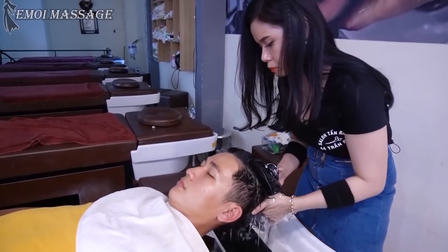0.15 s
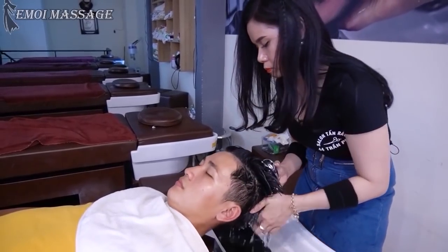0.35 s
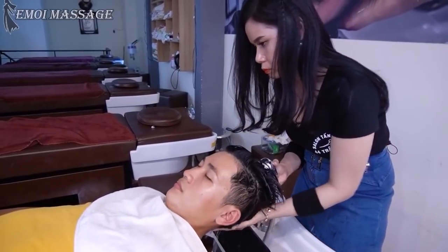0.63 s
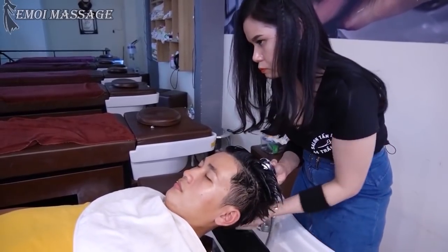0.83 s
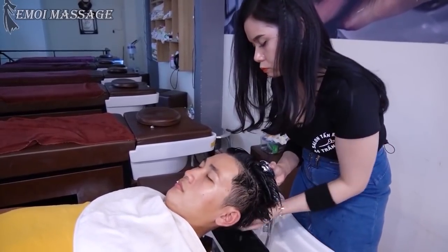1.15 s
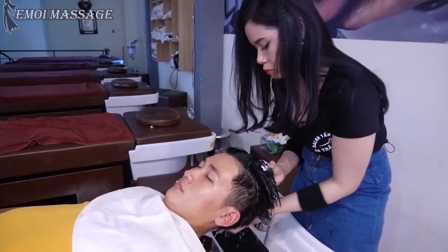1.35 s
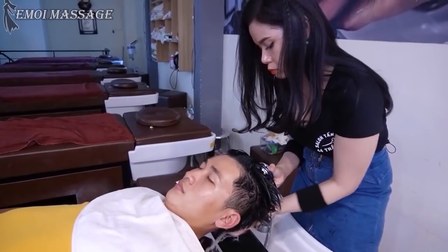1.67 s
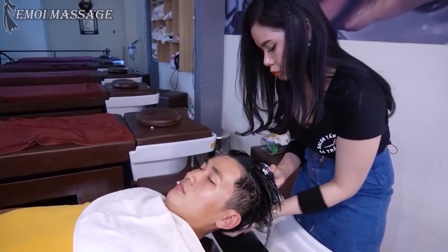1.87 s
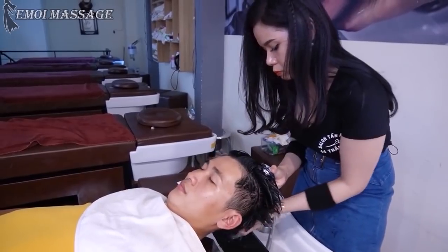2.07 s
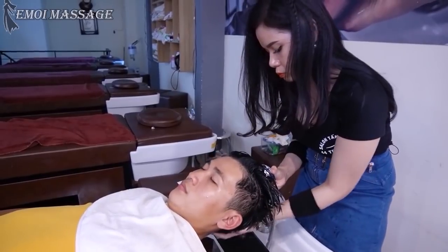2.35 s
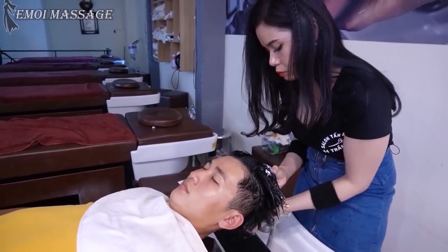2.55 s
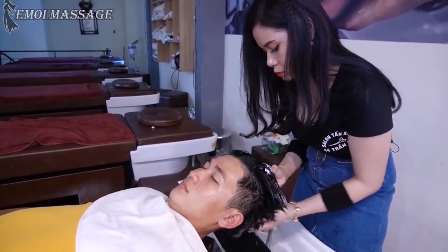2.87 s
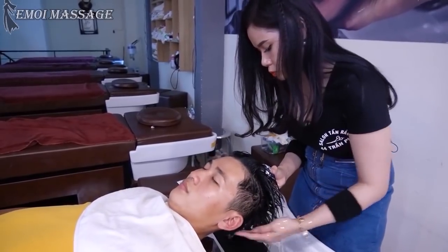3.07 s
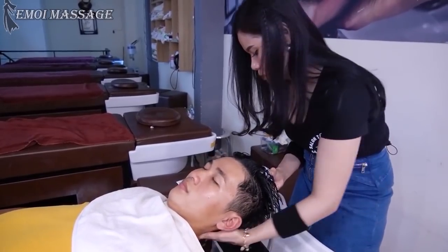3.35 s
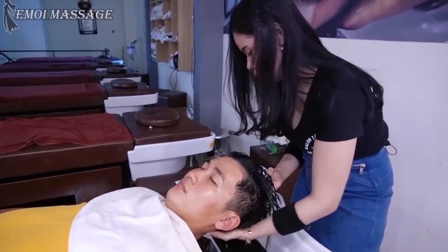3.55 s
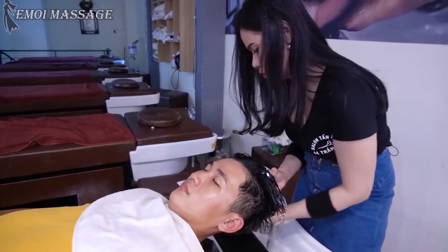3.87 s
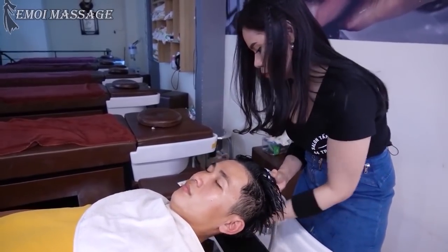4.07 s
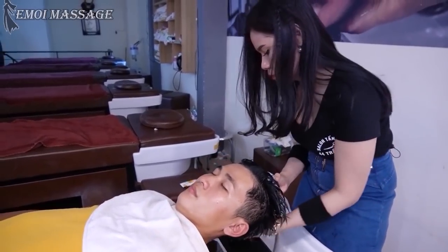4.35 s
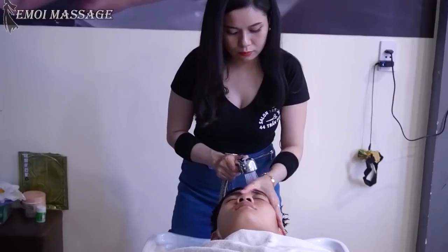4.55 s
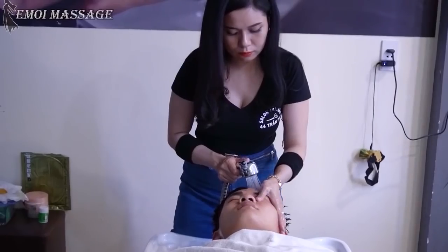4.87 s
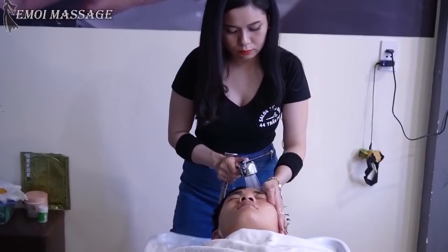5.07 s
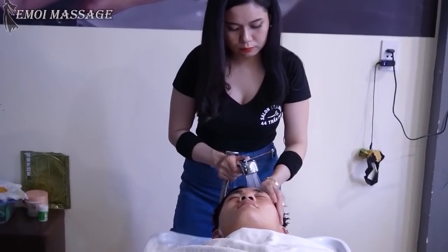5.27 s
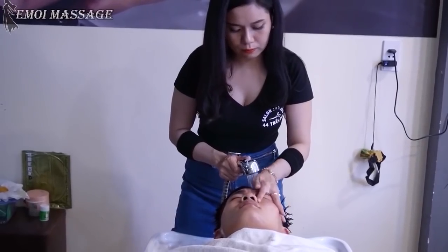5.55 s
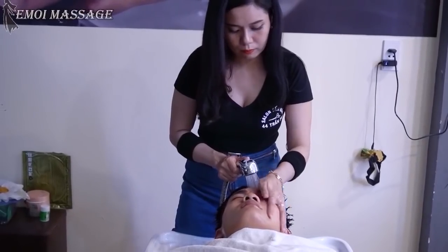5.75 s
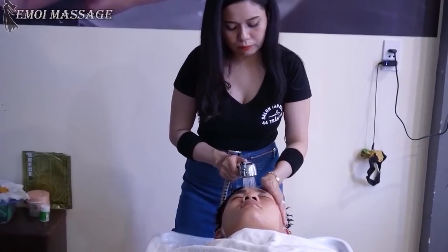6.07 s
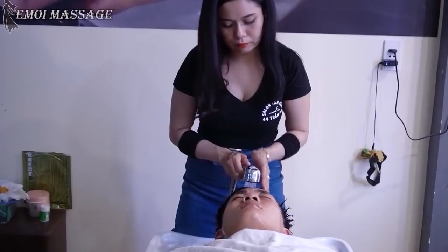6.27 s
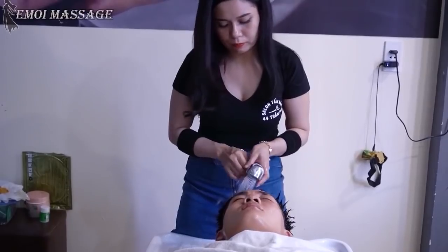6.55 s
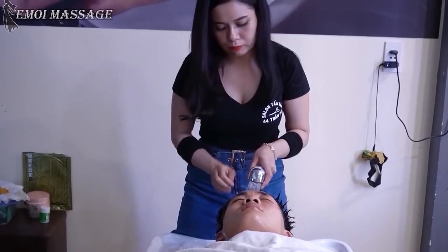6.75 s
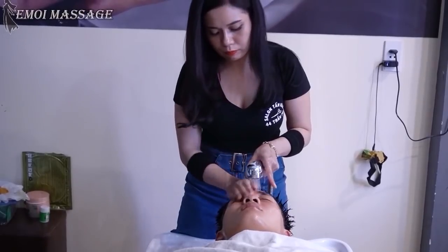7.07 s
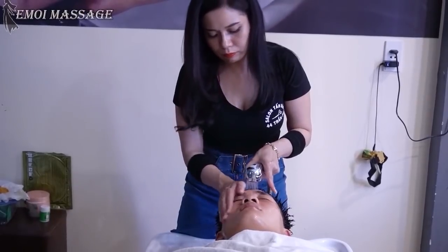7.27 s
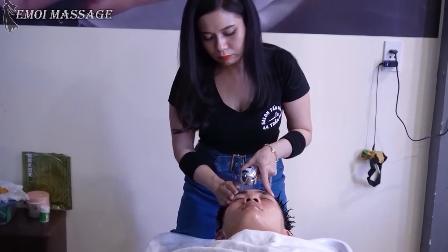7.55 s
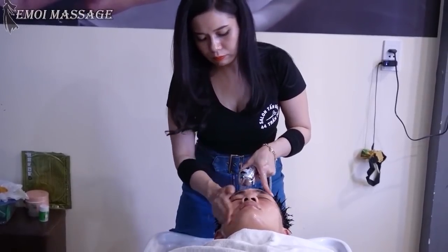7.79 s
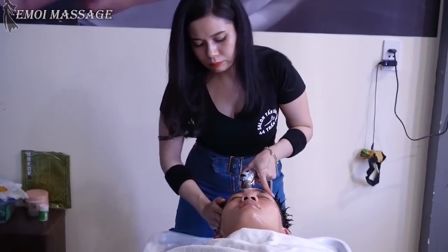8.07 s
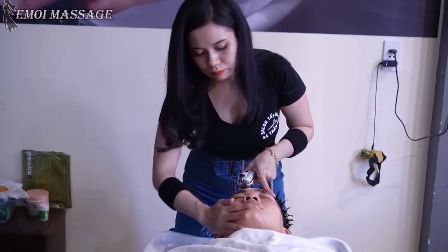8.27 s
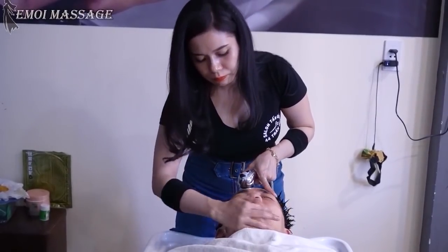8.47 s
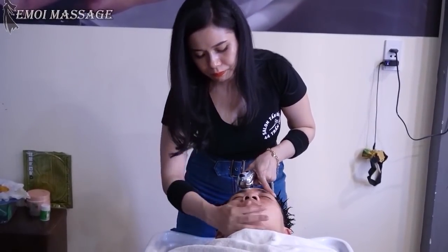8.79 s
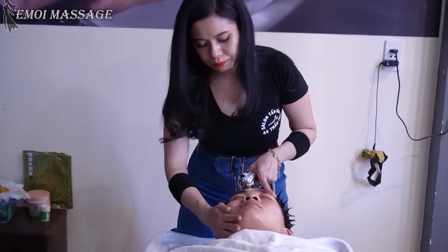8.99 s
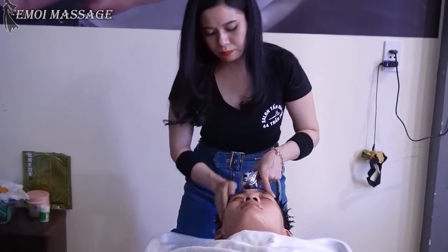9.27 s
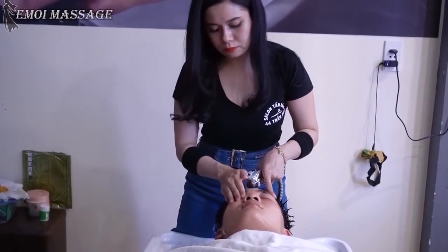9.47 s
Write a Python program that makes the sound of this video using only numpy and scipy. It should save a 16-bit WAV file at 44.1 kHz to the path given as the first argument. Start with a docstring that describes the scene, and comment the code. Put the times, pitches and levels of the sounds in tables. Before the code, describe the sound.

Wet hair squelches and pops under working hands while a fine handheld spray hisses and patters close up in a small hard room.

```python
"""Salon hair rinse

Hair is rinsed over a basin with a handheld sprayer, close up, in a small hard room; a fan hums behind.
Spray and wash are shaped random impacts and noise; pops, squeezes and presses are noise bursts
ringing air-pocket resonances. Gurgles are trains of decaying, rising sine bubbles; soft low bumps
and one deep rumble are low noise bursts. Steady tones make the hum, shaped noise the air and echoes.
"""
import sys
import numpy as np
from scipy import signal
from scipy.fft import rfft, irfft, next_fast_len
from scipy.io import wavfile
from scipy.ndimage import uniform_filter1d, map_coordinates

SR = 44100
rng = np.random.default_rng(int(sys.argv[2]) if len(sys.argv) > 2 else 0)


def to_wav(sig):
    """Store sig (one row per channel, or 1-D mono) as 16-bit WAV at the path in sys.argv[1].

    Samples outside -1..1 are clipped; the rate is SR.
    """
    pcm = np.clip(np.atleast_2d(sig), -1, 1) * 32767
    pcm = np.round(pcm).astype(np.int16)
    wavfile.write(sys.argv[1], SR, pcm.T)  # frames by channels


N = 424683

# spray course, before layer trims: t/s, fine mist level/dB, drop patter level/dB
SPRAY_COURSE = [(0, -46.5, -46.5), (.53, -45, -48), (.7, -53, -53), (1.05, -50.5, -59.5),
                (1.35, -56.5, -68), (2.3, -58, -62), (3, -57.5, -56), (3.9, -57.5, -58.5), (4.22, -47, -49),
                (4.38, -55, -56), (4.57, -54.5, -58), (4.61, -43, -46.5), (4.9, -42.5, -40.5),
                (5.4, -47, -47), (5.9, -44, -49), (6.3, -49.5, -55.5), (7.8, -51, -56.5),
                (9.63, -47.5, -47.5)]
# mist colour: f/Hz, gain/dB
MIST_COLOUR = [(150, -23.5), (500, -10), (1300, -8), (2500, -11.5), (4000, -11.5), (7000, -20.5),
               (9500, -4.5), (11800, -8.5), (12500, 9.5), (14500, 2.5), (16000, -2)]
# drop patter colour: f/Hz, gain/dB
PATTER_COLOUR = [(900, -40), (4000, -13.5), (7500, 1.5), (11000, -4.5), (16000, -8.5)]
# room air colour: f/Hz, gain/dB
AIR_COLOUR = [(20, -18), (45, 0.5), (120, -3), (185, -0.5), (280, -13), (390, -5.5), (480, -14), (680, -13),
              (1500, -24), (16000, -44)]
# room air course: t/s, level/dB
AIR_COURSE = [(4.57, -62.5), (4.58, -56.5), (6, -58)]
# steady fan tones at their loudest: f/Hz, level/dB
FAN_TONES = [(75.4, -68), (549.1, -72)]
# wall decay: f/Hz, t60/s
WALL_DECAY = [(300, 0.25), (6000, 0.11), (15000, 0.11)]
# soft low bumps, and one deep rumble at 50 Hz: t/s, level/dB, f/Hz, length scale/s
LOW_BUMPS = [(0, -51, 240, 0.046), (0.478, -53, 196, 0.042), (2.753, -55, 402, .04),
             (4.62, -45, 152, 0.052), (4.579, -49, 50, 0.059), (7.692, -48.5, 231, 0.028),
             (8.14, -50, 207, 0.12), (9.449, -48.5, 176, .11), (9.577, -38.5, 223, .052)]
# single large air pockets: t/s, level/dB, f/Hz, width/oct (before the floor in squelch)
POCKET_POPS = [(.1, -25, 3980, 0.88), (.132, -11.5, 5260, 0.15), (.138, -10, 3680, 0.78),
               (.184, -14.5, 7560, 2.8), (.22, -10.5, 5350, .36), (.292, -11.5, 5860, 1.1),
               (.319, -16.5, 5240, 1.01), (.423, -19, 3404, 0.12), (.507, -19, 6460, 1.1),
               (.678, -32.5, 4590, 0.078), (1.184, -22, 3380, 0.5), (1.858, -25, 3700, .27),
               (2.031, -32.5, 2490, 0.57), (2.31, -34.5, 6050, 0.21), (2.936, -27, 4380, 0.49),
               (3.059, -27, 4460, 1.4), (3.107, -19.5, 11020, 1.97), (3.281, -20.5, 2620, 0.69),
               (3.458, -39.5, 4425, 2), (3.861, -40, 3505, .18), (4.141, -22, 8330, 0.21),
               (4.218, -19.5, 7580, 1.2), (4.228, -11, 7210, 0.16), (4.301, -37, 2186, .18),
               (4.378, -25, 2820, 0.63), (4.386, -21, 3870, 0.2), (4.63, -22.5, 6860, 0.47),
               (4.969, -30, 1678, 0.13), (4.978, -20.5, 5540, 0.36), (5.071, -20.5, 6554, 0.6),
               (5.499, -24, 5510, 0.2), (6.169, -18.5, 8240, 0.14), (6.733, -17.5, 8430, 0.15),
               (7.253, -25, 5420, 0.15), (7.39, -15, 5340, 0.21), (7.986, -43, 2230, 0.13),
               (8.106, -22, 3450, 0.19), (8.327, -23, 6840, 0.71), (8.367, -19.5, 7030, 0.61),
               (8.42, -25, 6760, 0.23), (8.736, -34.5, 3870, 0.22), (8.785, -46, 1444, 0.18),
               (8.804, -20, 7720, 0.88), (8.867, -19, 5830, 0.32), (8.995, -36, 3370, 0.65),
               (9.089, -20.5, 5790, 0.63), (9.182, -15.5, 5390, 0.19), (9.207, -22, 5800, 0.48),
               (9.476, -39.5, 3050, 0.78), (9.548, -42, 2050, 0.17), (9.595, -26, 6760, .25)]
# gurgles in a hollow of hand and hair, before trim: t/s, length/s, level/dB, start f/Hz, end f/Hz
HOLLOW_GURGLES = [(0.12, 0.046, -39, 1473, 1562), (0.158, .19, -56, 1485, 729),
                  (4.665, 0.56, -55.5, 2473, 1198), (5.721, 0.11, -48, 2710, 2650),
                  (5.816, 0.22, -42, 3580, 3584), (6.065, 0.12, -52, 2860, 2980),
                  (6.335, 0.21, -50.5, 1886, 1640), (6.501, 0.044, -39.5, 1820, 1750),
                  (6.543, 0.065, -43, 864, 911), (6.55, .115, -42.5, 1250, 1207),
                  (7.26, 0.18, -41, 3374, 3090)]
# finger squeezes: t/s, length/s, level/dB before size spread, centre f/Hz, width/oct before narrowing
FINGER_SQUEEZES = [(.15, 0.085, -33, 6400, 2.07), (0.246, 0.033, -14.5, 5370, 0.29),
                   (0.275, 0.076, -23.5, 5830, 1.12), (0.398, 0.089, -41, 3080, 0.45),
                   (1.452, 0.027, -44, 2483, 0.61), (2.391, 0.038, -38.5, 2800, 0.44),
                   (2.777, .035, -36, 5060, 1.22), (3.311, .035, -31, 9900, 1.2),
                   (3.742, .18, -52, 5440, 0.24), (4.031, 0.13, -38.5, 6326, 1.26),
                   (4.129, 0.14, -47.5, 3060, 0.77), (5.04, 0.14, -38, 6800, 0.87),
                   (5.921, .06, -27.5, 8870, 0.44), (6.152, 0.046, -33.5, 9240, .6),
                   (7.309, .06, -37, 6860, 0.88), (7.57, 0.04, -45.5, 5230, 0.41),
                   (7.903, .05, -38, 4910, 0.39), (8.147, .25, -38, 6800, .8),
                   (8.648, .05, -45, 7030, 0.23), (8.812, .125, -32.5, 5760, 0.79)]
# cupped-hand presses: t/s, splash level/dB, splash f/Hz, suck level/dB
HAND_PRESSES = [(0.822, -29, 7710, -23), (1.163, -15, 8290, -18.5), (1.483, -12, 7450, -27.5),
                (1.86, -16, 7450, -14.5), (2.011, -19, 10890, -28), (2.2, -22, 6800, -15.5),
                (2.452, -17, 5130, -38), (2.567, -25, 7380, -17), (2.785, -23.5, 4430, -20),
                (3.284, -17, 5410, -25), (7.635, -25.5, 9500, -36.5)]

BUMP_REF_OCT, BUMP_REF_HZ = 0.47, 196.3  # width at this pitch; lower bumps are broader
POCKET_REF_S, POCKET_REF_HZ, POCKET_POWER = 0.0027, 5630, 0.59  # length at this pitch; lower lasts longer
LIFT_S, SUCK_HZ = 0.023, 7450  # landing-to-lift delay, suck pitch
SPLASH_OCT, SUCK_OCT = 0.78, 0.3
BAND_LIMIT_HZ = 16100


def amp(db):
    """Decibels to gain."""
    return 10 ** (np.asarray(db) / 20)


def unit(x):
    """Scale to rms 1."""
    return x / np.sqrt(np.mean(x ** 2) + 1e-20)


def along(points, hz):
    """Interpolate (Hz, value) points on a log-frequency axis."""
    f, v = np.transpose(points)
    return np.interp(np.log(hz + 1), np.log(f + 1), v)


def curves(rows):
    """One value per sample for each column after the time."""
    s, *columns = np.transpose(rows)
    t = np.arange(N) / SR
    return [np.interp(t, s, column) for column in columns]


def wobble(rate_hz):
    """Smooth random curve with the given knot rate."""
    knots = rng.standard_normal(int(N * rate_hz / SR) + 4)
    return map_coordinates(knots, [np.arange(N) * rate_hz / SR])


def filtered(x, response):
    """Apply a frequency response by FFT."""
    size = next_fast_len(len(x) + SR // 2)
    spectrum = rfft(x, size) * response(np.fft.rfftfreq(size, 1 / SR))
    return irfft(spectrum, size)[:len(x)]


def ringing(response, size=4096):
    """Minimum-phase impulse response of a gain curve, by cepstral folding."""
    cepstrum = irfft(np.log(response(np.fft.rfftfreq(size, 1 / SR)) + 1e-6))
    cepstrum[1:size // 2] *= 2
    cepstrum[size // 2 + 1:] = 0
    return irfft(np.exp(rfft(cepstrum)))


def bell(hz, centre_hz, octaves):
    """Gain of a steep-sided resonance."""
    return np.exp(-2 * abs(np.log2((hz + 1) / centre_hz) / octaves) ** 3)


def add(track, s, sound):
    """Mix a sound into the track at time s."""
    part = track[max(round(s * SR), 0):][:len(sound)]
    part += sound[:len(part)]


def patchy(x, depth_db, size=9):
    """Blotchy, uneven texture: random time-frequency gain, smoothed over size bins; rms 1."""
    z = signal.stft(x, nperseg=256)[2]
    field = uniform_filter1d(rng.standard_normal(z.shape), size, axis=0)
    field = uniform_filter1d(field, size, axis=1)
    return unit(signal.istft(z * amp(depth_db * unit(field)), nperseg=256)[1][:N])


def burst(db, length_s, response, clump_db, swell=0.67):
    """Clumpy noise rush swells, dies and rings a resonance; db is level over length_s."""
    t = np.arange(int(4 * length_s * SR) + 8) / SR
    knots = np.clip(rng.standard_normal(int(t[-1] * 200) + 4), -2, 2)
    clumps = map_coordinates(knots, [t * 200], order=1)
    grain_db = 3.05 * rng.standard_normal(len(t))
    rush = rng.standard_normal(len(t)) * amp(grain_db + clump_db * clumps)
    envelope = (t / length_s) ** swell * np.exp(-2 * t / length_s)
    sound = signal.fftconvolve(rush * envelope, ringing(response))
    return amp(db) * np.sqrt(length_s * SR) * sound / np.linalg.norm(sound)


def pocket(db, pitch_hz, octaves, length_s, splash_db=-20, thud_db=-56, clump_db=7):
    """Air pocket: its resonance, torn-film splash above, trace of body below."""
    def gain(hz):
        above = 1 / (1 + (pitch_hz / (hz + 1)) ** 8) / (1 + (hz / pitch_hz / 2) ** 2)
        # narrow, clean-toned pockets splash least
        splash = amp(splash_db) * np.sqrt(octaves) * above
        body = amp(thud_db) * hz / (hz + 900)
        return bell(hz, pitch_hz, octaves) + splash + body

    # long splashes break into separate spurts
    return burst(db, length_s, gain, clump_db * length_s / (length_s + 0.0086))


def squelch(db, pitch_hz, octaves, count=4, after_db=-16, after_s=0.022,
            ooze_db=-22, ooze_s=0.029, lead_s=0.008):
    """Water oozes, a pocket bursts, droplets land after it: list of (delay/s, sound)."""
    octaves = max(octaves, 0.17)
    length_s = POCKET_REF_S * (POCKET_REF_HZ / pitch_hz) ** POCKET_POWER
    parts = [(-length_s / 10, pocket(db, pitch_hz, octaves, length_s)),
             (-lead_s, pocket(db + ooze_db, pitch_hz, octaves + 0.28, ooze_s))]
    waits = rng.gamma(2, after_s / 2, count)
    sizes, shifts = rng.standard_normal((2, count))
    for wait, size, shift in zip(waits, sizes, shifts):
        drop_hz = min(1.2 * pitch_hz * np.exp(0.16 * shift), 14000)
        drop = pocket(db + after_db + 3 * size, drop_hz, 0.57 + octaves / 2, 0.0014)
        parts.append((wait, drop))
    return parts


def drops(rate_hz, spread_db):
    """Random impacts of uneven size and either sign, rms 1."""
    sizes = amp(spread_db * np.clip(rng.standard_normal(N), -2, 2)) * rng.choice([-1, 1], N)
    return unit(sizes * (rng.random(N) < rate_hz / SR))


def bubbles(rate_hz, spread_db, pitch_hz, octaves, length_s):
    """Many small pockets of random size, pitch and length, rms 1."""
    out = np.zeros(N)
    count = int(rate_hz * N / SR)
    times = rng.random(count) * N / SR
    variations = np.clip(rng.standard_normal((count, 3)), -2, 2)
    for s, (size, shift, stretch) in zip(times, variations):
        hz = pitch_hz * np.exp(0.29 * shift)
        add(out, s, pocket(spread_db * size, hz, octaves, length_s * np.exp(stretch / 2)))
    return unit(out)


def spray(mist_db=-1.0, patter_db=-6.0, bubble_db=-2):
    """Fine jets fizz on the hair; larger drops and bubbles patter into the basin."""
    mist_level_db, patter_level_db = curves(SPRAY_COURSE)
    flutter = np.clip(wobble(45), -1.7, 1.7)
    fine = filtered(drops(rate_hz=10000, spread_db=15.5), lambda hz: amp(along(MIST_COLOUR, hz)))
    mist = patchy(fine, depth_db=5)
    coarse = filtered(drops(rate_hz=4500, spread_db=16.0), lambda hz: amp(along(PATTER_COLOUR, hz)))
    patter = patchy(coarse, depth_db=8.5)
    froth = bubbles(rate_hz=120, spread_db=2.5, pitch_hz=6800, octaves=0.28, length_s=0.0081)
    splashes = patter * amp(patter_db + 2 * flutter) + amp(bubble_db) * froth
    return mist * amp(mist_level_db + mist_db + 4 * flutter) + splashes * amp(patter_level_db)


def wash(level_db=-5, full_db=-42, growth_db_per_db=2.4, centre_hz=6500, octaves=2.9):
    """Jets hit the scalp squarely: drops merge into a hiss that grows steeply with mist level."""
    flow_db, _ = curves(SPRAY_COURSE)
    noise = filtered(rng.standard_normal(N), lambda hz: bell(hz, centre_hz, octaves))
    sheet = patchy(noise, depth_db=4.5)
    return sheet * amp(full_db + level_db + growth_db_per_db * (flow_db - full_db) + wobble(11))


def background():
    """Low air noise and fan tones with wandering phase; both are louder in the second half."""
    level_db, = curves(AIR_COURSE)
    t = np.arange(N) / SR
    air = unit(filtered(rng.standard_normal(N), lambda hz: amp(along(AIR_COLOUR, hz))))
    hum = np.zeros(N)
    for hz, db in FAN_TONES:
        hum += amp(db) * np.sqrt(2) * np.sin(2 * np.pi * hz * t + wobble(1.2) / 2)
    # hum falls twice as many dB as the air below its final level
    hum_db = 2 * (level_db - level_db[-1]).clip(max=0)
    return air * amp(level_db) + hum * amp(hum_db)


def room(x, gap_s=0.003, count=4):
    """Walls answer with decaying noise; four random echo patterns take turns at a steady pace."""
    out = np.zeros(N)
    turn = (np.arange(N) / SR * np.pi).astype(int) % count
    for k in range(count):
        hz, t, z = signal.stft(rng.standard_normal(SR // 2), SR, nperseg=256)
        decay = amp(-60 * t / along(WALL_DECAY, hz)[:, None])
        tail = signal.istft(z * decay, SR, nperseg=256)[1]
        tail = np.pad(tail / np.linalg.norm(tail), (int(gap_s * SR), 0))
        out += signal.fftconvolve(x * (turn == k), tail)[:N]
    return out


def bumps():
    """Soft low bumps and one deep rumble: noise bursts through low resonances."""
    out = np.zeros(N)
    for s, db, pitch_hz, length_s in LOW_BUMPS:
        octaves = BUMP_REF_OCT * np.sqrt(BUMP_REF_HZ / pitch_hz)
        bump = burst(db, length_s, lambda hz: bell(hz, pitch_hz, octaves) + 0.002, clump_db=3.5)
        add(out, s - length_s / 10, bump)
    return out


def pops():
    """Large pockets burst one at a time."""
    out = np.zeros(N)
    for s, db, pitch_hz, octaves in POCKET_POPS:
        for delay_s, sound in squelch(db, pitch_hz, octaves):
            add(out, s + delay_s, sound)
    return out


def gurgle(level_db=-1, ref_rate_hz=800, ref_pitch_hz=2700, scatter=0.13, cycles=4, rise=0.028,
           fade_s=0.022, sag_db=3):
    """Jets beat bubbles into a hollow of hand and hair whose resonance slides."""
    out = np.zeros(N)
    for start_s, length_s, db, start_hz, end_hz in HOLLOW_GURGLES:
        # low bubbles come less often
        rate_hz = ref_rate_hz * (start_hz * end_hz / ref_pitch_hz ** 2) ** 0.7
        count = int(length_s * rate_hz) + 1
        progress = (np.arange(count) + 0.5) / count
        times = start_s + length_s * progress + rng.standard_normal(count) / rate_hz / 2
        edge_s = np.minimum(times - start_s, start_s + length_s - times)
        fade = np.clip(edge_s / fade_s, 0, 1)
        sizes = unit(amp(5.4 * np.clip(rng.standard_normal(count), -2, 2)))
        sizes = sizes * fade * amp(db + level_db + sag_db * (0.5 - progress))
        glide_hz = start_hz * (end_hz / start_hz) ** progress
        pitches_hz = glide_hz * np.exp(scatter * rng.standard_normal(count))
        for s, size, hz in zip(times, sizes, pitches_hz):
            age = np.arange(int(6 * cycles * SR / hz)) * hz / SR / cycles
            # pitch climbs as the bubble nears the surface
            phase = 2 * np.pi * cycles * age * (1 + rise * (age / 2 - 1))
            bubble = np.sin(phase) * age * np.exp(-2 * age)
            add(out, s, size * np.sqrt(SR / rate_hz) * bubble / np.linalg.norm(bubble))
    return out


def squeezes(rate_hz=280, spread_db=4, uneven_s=0.023, scatter=0.2, narrow=0.72, pocket_s=0.0041,
             spurt_db=-13, spurt_hz=10500, spurt_octaves=1.6):
    """Fingers wring out a quick swarm of uneven pockets, while a fine spurt of water hisses."""
    out = np.zeros(N)
    for s, length_s, db, pitch_hz, octaves in FINGER_SQUEEZES:
        count = int(length_s * rate_hz) + 1
        slip, size, shift = np.clip(rng.standard_normal((count, 3)), -2, 2).T
        times = s + (np.arange(count) + slip / 4) * length_s / count
        # long squeezes are more uneven
        sizes = unit(amp(spread_db * (length_s / uneven_s) ** 0.5 * size))
        gains = sizes * np.sqrt(length_s / count / pocket_s)
        pitches_hz = pitch_hz * np.exp(scatter * octaves * shift)
        for when, gain, hz in zip(times, gains, pitches_hz):
            add(out, when, gain * pocket(db, hz, narrow * octaves, pocket_s))
        add(out, s, pocket(db + spurt_db, spurt_hz, spurt_octaves, length_s))
    return out


def presses(fling_db=-13, fling_hz=11500, fling_octaves=1.71, fling_s=0.0064,
            snap_db=-3, snap_gap_s=0.008, snap_s=0.00039, snap_octaves=0.23):
    """Hand lands with a splash; lifting, hair sucks and flings drops; films snap around both."""
    out = np.zeros(N)
    for s, splash_db, splash_hz, suck_db in HAND_PRESSES:
        for delay_s, sound in squelch(splash_db, splash_hz, SPLASH_OCT):
            add(out, s + delay_s, sound)
        for delay_s, sound in squelch(suck_db, SUCK_HZ, SUCK_OCT):
            add(out, s + LIFT_S + delay_s, sound)
        fling = pocket(max(splash_db, suck_db) + fling_db, fling_hz, fling_octaves, fling_s)
        add(out, s + LIFT_S, fling)
        # one snap before landing, one either side of the suck
        for when in (-snap_gap_s, LIFT_S - snap_gap_s, LIFT_S + snap_gap_s):
            slip, size = rng.standard_normal(2)
            snap = pocket(suck_db + snap_db + 2 * size, SUCK_HZ, snap_octaves, snap_s)
            add(out, s + when + slip * snap_gap_s / 10, snap)
    return out


def scene(room_db=-10):
    """Water, hands and bumps with their wall reflections, over the background."""
    water = spray() + wash() + bumps() + pops() + gurgle() + squeezes() + presses()
    return (water + amp(room_db) * room(water) + background())[None]


def record(dry):
    """Recorder keeps nothing above its band limit."""
    return np.array([filtered(channel, lambda hz: hz < BAND_LIMIT_HZ) for channel in dry])


dry = scene()
out = record(dry)
to_wav(out)
```